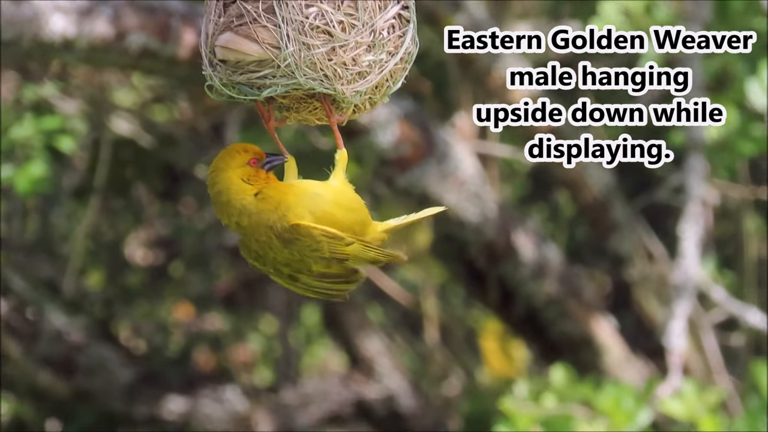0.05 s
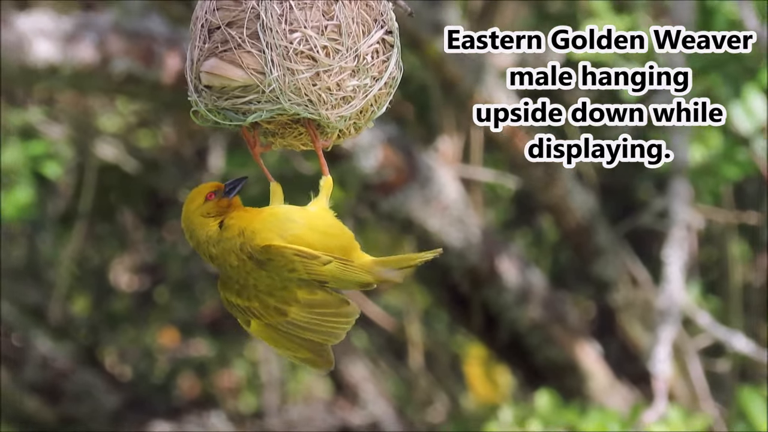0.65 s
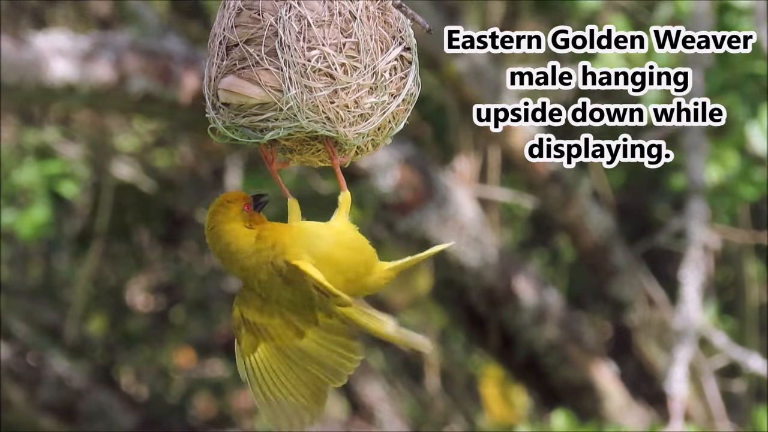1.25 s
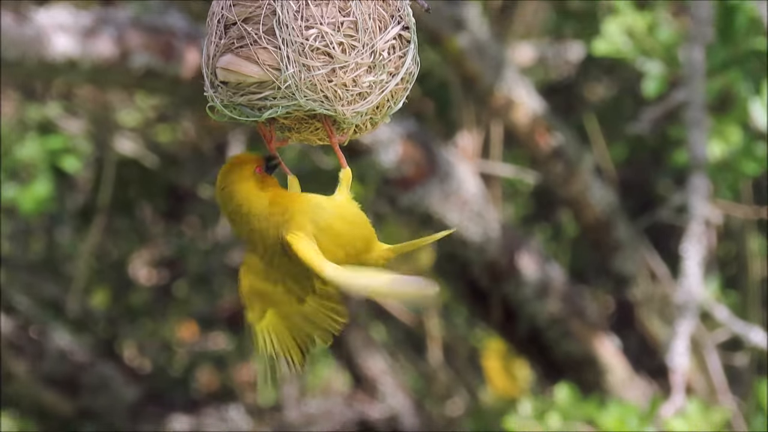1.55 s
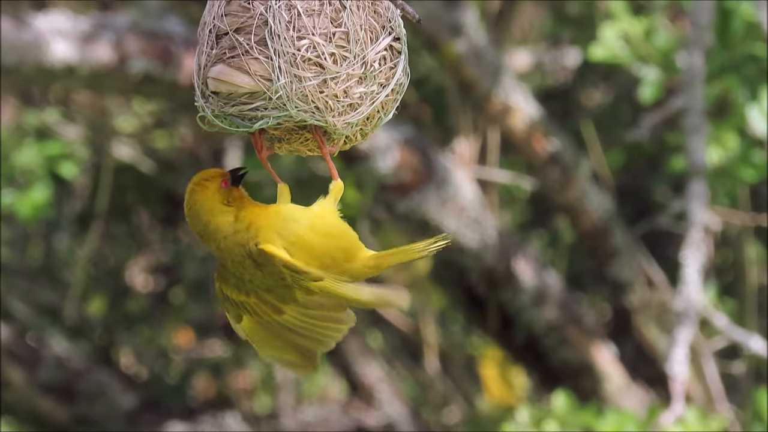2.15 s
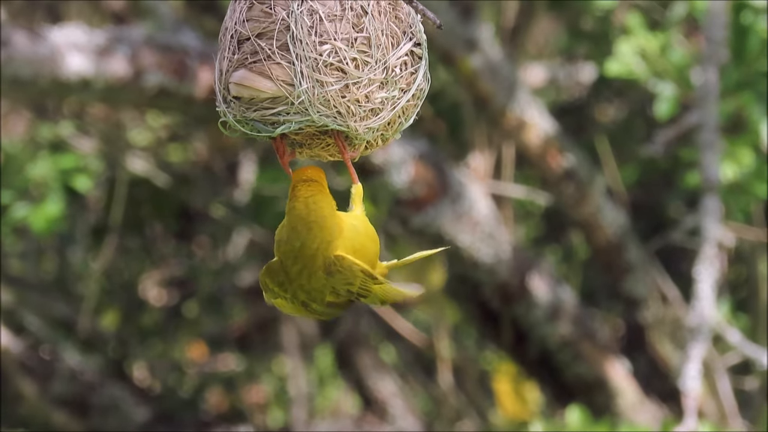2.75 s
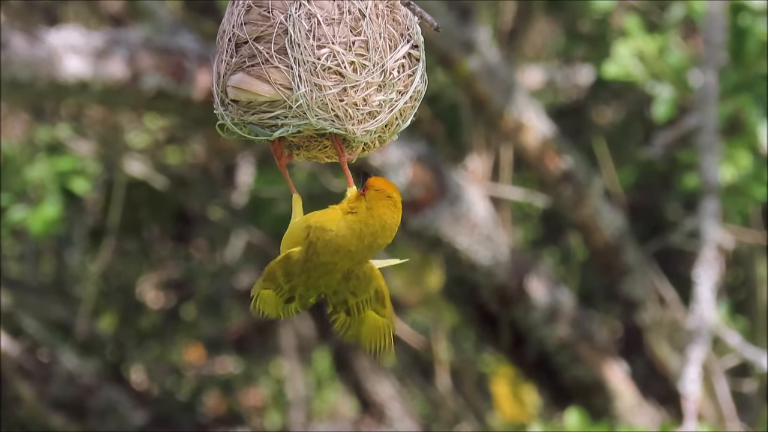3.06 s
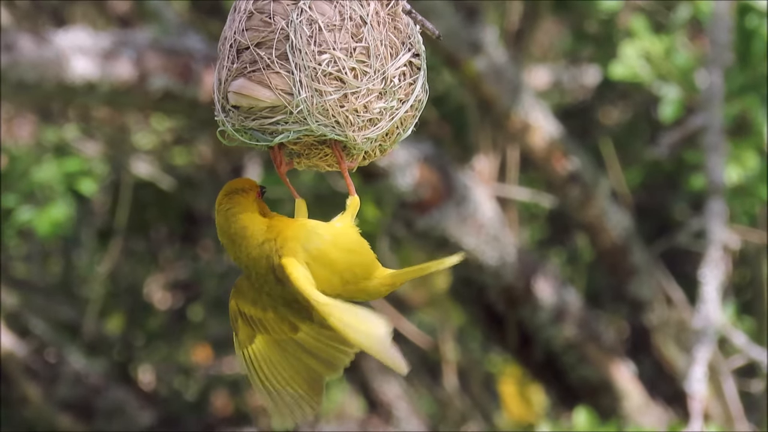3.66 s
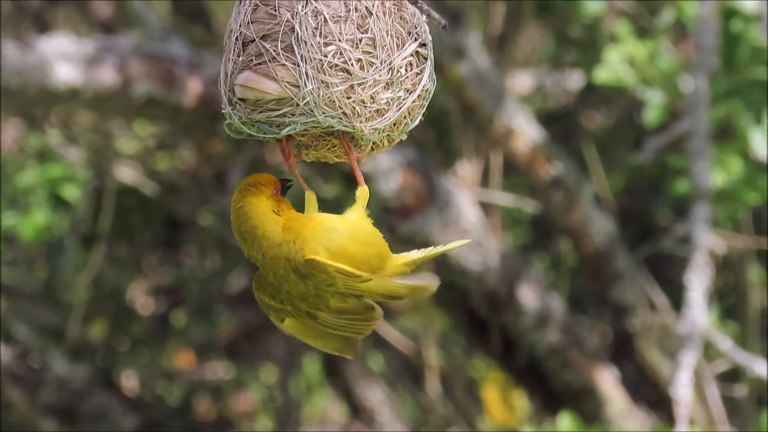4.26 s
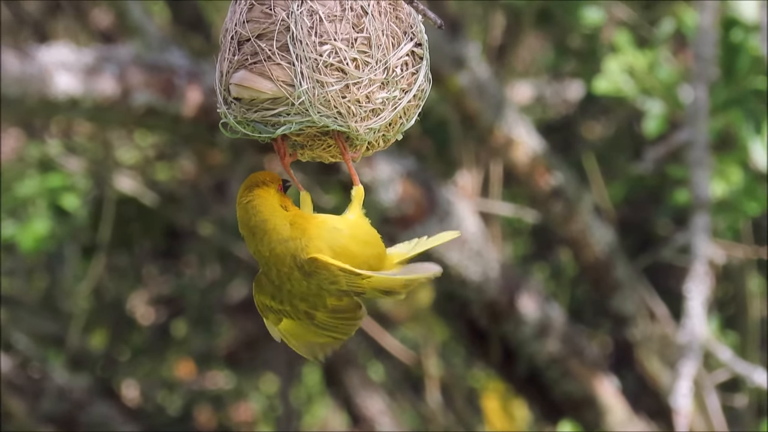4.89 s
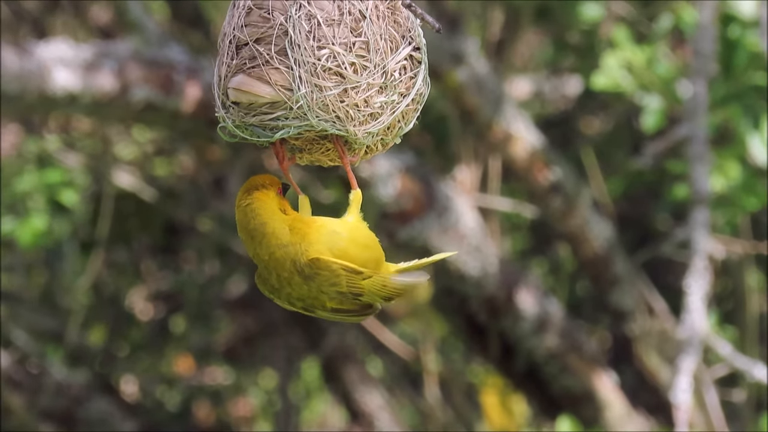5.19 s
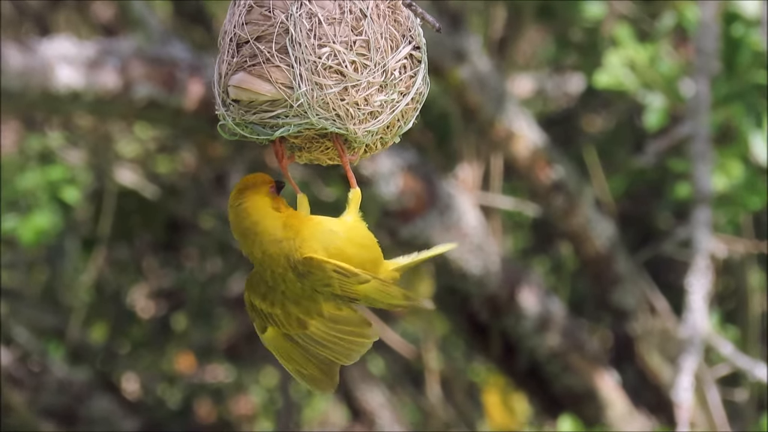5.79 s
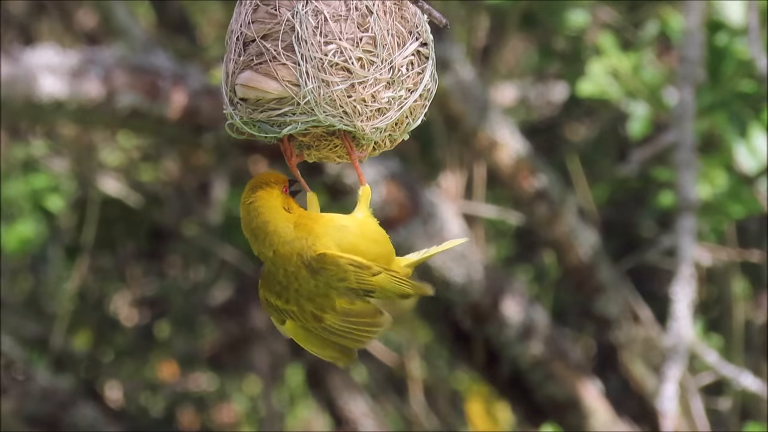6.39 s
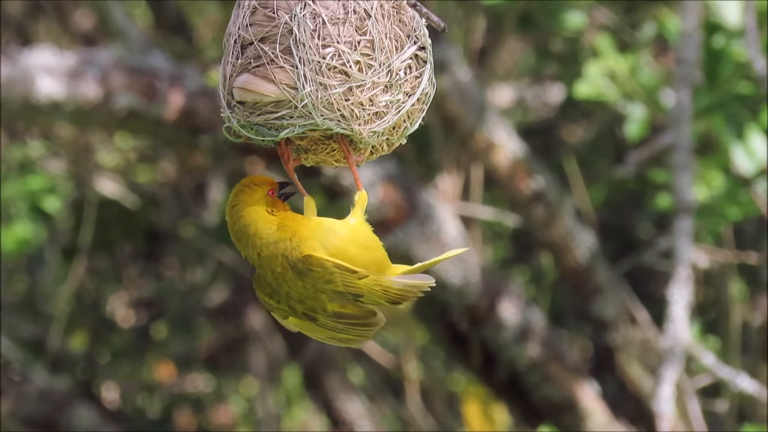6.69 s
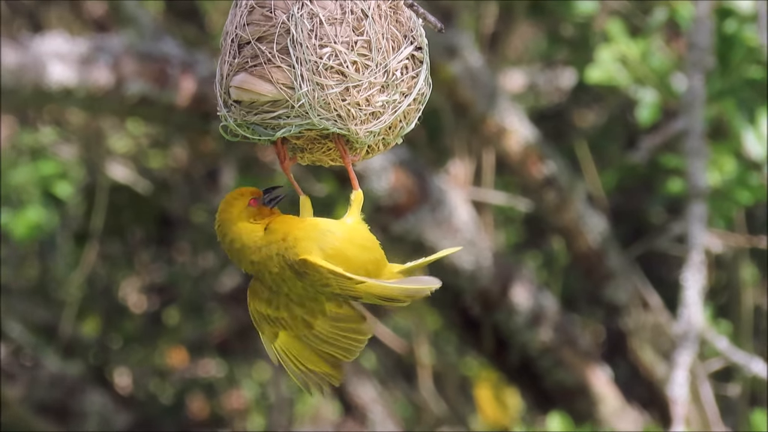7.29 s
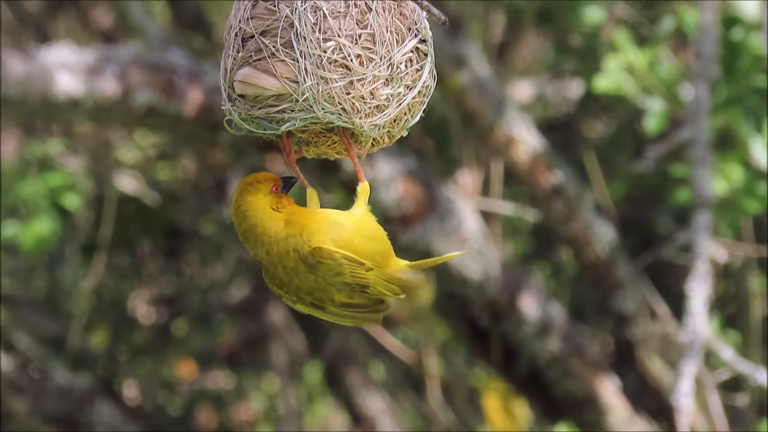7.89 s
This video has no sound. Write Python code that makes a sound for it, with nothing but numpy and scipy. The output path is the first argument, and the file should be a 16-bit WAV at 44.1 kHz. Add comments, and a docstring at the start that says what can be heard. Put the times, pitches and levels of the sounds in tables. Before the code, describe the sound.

A small bird in a thicket opens with two high, downward slurred notes and a rasping chirp. It then sings runs of wheezy, falling buzzes, three or four a second, dotted with short rasps. Soft nasal calls and a few thin whistles come from farther off. Leaves and trunks add a light echo, a faint outdoor rumble lies underneath, and two soft wind puffs touch the microphone. Everything gradually fades through the second half.

```python
"""A weaver bird displays at its nest in a thicket, whose leaves and trunks scatter the song.
Over a soft outdoor rumble come a thin 5 kHz ring and a slurred note, then the first rasping chirp and
a puff of wind. From about 0.9 s wheezy falling buzzes repeat, sung with both sides of the syrinx: two
oscillators, frequency-modulated by fast trills. From 2.6 s nasal calls come from farther off,
later joined by thin whistles, and from 3.4 s the whole scene fades away."""
import sys
import numpy as np
from scipy import signal
from scipy.fft import rfft, irfft
from scipy.io import wavfile

SR = 44100
rng = np.random.default_rng(int(sys.argv[2]) if len(sys.argv) > 2 else 0)


def unload_audio(sound):
    """Save the sound as a 16-bit wav file, at the path given as the first command line argument."""
    columns = np.transpose(np.atleast_2d(sound))
    # keep every value between -1 and 1, then stretch to whole-number steps
    steps = np.round(np.clip(columns, -1, 1) * 32767)
    wavfile.write(sys.argv[1], SR, steps.astype(np.int16))


N = 354608


def from_db(db):
    """Amplitude ratio: a factor of ten for every 20 dB."""
    return 10 ** (np.asarray(db) / 20)


def unit_power(x):
    """Normalisation to a mean square of one."""
    return x / np.sqrt(np.mean(x ** 2) + 1e-20)


def at_hz(points, hz):
    """Interpolation of a spectrum on a log-frequency axis."""
    freqs, values = np.transpose(points)
    return np.interp(np.log(np.maximum(hz, 1)), np.log(freqs), values)


def wander(count, per_s):
    """Low-pass noise: straight lines join Gaussian values, per_s of them each second."""
    knots = rng.standard_normal(512)
    return np.interp(np.arange(count) * per_s / SR, np.arange(len(knots)), knots)


def add(track, start_s, sound):
    """Superposition: a sound sums with what the track already holds."""
    first = max(int(start_s * SR), 0)
    part = sound[:max(N - first, 0)]
    track[first:first + len(part)] += part


def clock(length_s):
    """Time axis of a note, in seconds."""
    return np.arange(int(length_s * SR)) / SR


def ramp(t, rise_s):
    """Linear rise from 0 at time zero to 1, then held."""
    return np.clip(t / rise_s, 0, 1)


def envelope(t, attack_s, release_s):
    """Trapezoidal envelope: attack, hold, release."""
    return ramp(t - t[0], attack_s) * ramp(t[-1] - t, release_s)


def glide(t, first_hz, last_hz, bend):
    """Power-law frequency sweep: the greater the bend, the later the pitch moves."""
    return first_hz + (last_hz - first_hz) * (t / t[-1]) ** bend


def scoop(t, flat, settle_s=0.00301):
    """Onset transient: the pitch starts flat by a fraction and settles exponentially."""
    return 1 - flat * np.exp(-t / settle_s)


# Frequency response of the throat and open beak. Each row: frequency in Hz, gain in dB.
BEAK_RESPONSE = [(1500, 1.5), (3000, -2), (3700, -0.5), (4150, -3.5), (4450, 1.5), (4750, -3.5),
                 (5150, 3.5), (5600, -6.5), (6500, -5.5), (7200, -3.5), (8100, 0), (9400, -6), (10000, -8),
                 (10900, -20), (12000, -22)]

def syrinx(t, pitch_hz, effort, overtone_db, swing=0, trill_hz=0, unsteady=0, pulsing=0, jitter=0,
           dwell=0.22, lead=0):
    """Source and filter: one side of the syrinx makes a trilled tone and octave, shaped by the beak."""
    # frequency modulation at an uneven rate; dwell flattens the top of each stroke
    slip_s = np.cumsum(unsteady * wander(len(t), trill_hz)) / SR
    trill_phase = 2 * np.pi * trill_hz * (t + slip_s - np.interp(0, t, slip_s))
    stroke = np.sin(trill_phase) + dwell * np.cos(2 * trill_phase)
    hz = pitch_hz * (1 + swing * stroke) * (1 + jitter * wander(len(t), 1500))
    phase = 2 * np.pi * np.cumsum(hz) / SR
    # amplitude modulation of uneven strength, peaking lead radians before the top of the stroke
    depth = pulsing * swing / (np.max(np.abs(swing)) + 1e-3)
    throb = 1 + depth * (np.sin(trill_phase + lead) + 0.42 * wander(len(t), 2 * trill_hz))
    tone = from_db(at_hz(BEAK_RESPONSE, hz)) * np.sin(phase)
    octave = from_db(overtone_db + at_hz(BEAK_RESPONSE, 2 * hz)) * np.sin(2 * phase)
    return np.sqrt(2) * (tone + octave) * throb * effort


def near_echo(song, strength, notch_hz):
    """Comb filtering: an inverted reflection from close by weakens every multiple of notch_hz."""
    return song - strength * np.interp(np.arange(N) - SR / notch_hz, np.arange(N), song)


def thicket(song, wet_db, ring_hz=4500, ring=0, leaves_t60_s=0.069, trunks_t60_s=0.63):
    """Scattering: leaves, trunks and the trees behind return many small, dull echoes."""
    delay = clock(0.5)
    scatter = rng.standard_normal(len(delay)) * (rng.random(len(delay)) < 0.08)
    leaves = np.exp(-np.log(1000) * delay / leaves_t60_s)
    trunks = from_db(-11) * np.exp(-np.log(1000) * delay / trunks_t60_s)
    trees = from_db(-26) * np.exp(-((delay - 0.09) / 0.02) ** 2)   # a second swell after 90 ms
    echoes = unit_power(scatter * (leaves + trunks + trees)) / np.sqrt(len(delay))
    echoes = signal.sosfilt(signal.butter(2, 7500, fs=SR, output="sos"), echoes)
    # one narrow band of the later echoes rings on
    ringing = signal.lfilter(*signal.iirpeak(ring_hz, Q=18, fs=SR), echoes * (delay > 0.03))
    return song + from_db(wet_db) * signal.fftconvolve(song, echoes + ring * ringing)[:N]


# Spectrum of the background noise. Each row: frequency in Hz, relative spectral density in dB.
BACKGROUND_SPECTRUM = [(20, -3.5), (40, 4), (64, 0.5), (100, -5.5), (160, -7), (270, -4.5), (330, -10.5),
                       (450, -11.5), (700, -12.5), (1200, -18), (2300, -21), (3500, -19.5), (6000, -25.5),
                       (15500, -31.5)]
# Noise that differs between the channels. Each row: frequency in Hz, level against the middle in dB.
SIDE_NOISE_LEVELS = [(60, -61), (150, -66), (380, -28), (950, -29), (2380, -46.5), (5980, -30.5),
                     (15000, -6)]

def background(level_db=-53):
    """Shaped noise: outdoor rumble in the middle, plus a faint high hiss differing between channels."""
    hz = np.arange(N // 2 + 1) * SR / N
    mid, side = rfft(rng.standard_normal((2, N))) * from_db(at_hz(BACKGROUND_SPECTRUM, hz))
    side = side * from_db(at_hz(SIDE_NOISE_LEVELS, hz))
    return from_db(level_db) * unit_power(irfft(np.stack([mid + side, mid - side]), N))


# Thin tones: at 0 s a 5 kHz ring left by a chirp, at 3.526 s a steady 5 kHz tone within a wheeze,
# otherwise falling whistles. Each row: start in seconds, length in seconds, level in dB,
# first pitch in Hz, last pitch in Hz, trill swing as a fraction of the pitch.
THIN_TONES = [(0, .054, -60.5, 5020, 5000, 0.0038), (3.431, 0.046, -53.5, 3980, 3040, 0.014),
              (3.526, 0.088, -51, 4970, 4960, 0.0025), (5.515, .14, -71, 7860, 7160, 0.0081),
              (6.311, 0.044, -53.5, 2720, 2500, 0.082), (6.523, 0.076, -57.5, 2560, 2120, 0.058),
              (6.586, 0.073, -59, 2205, 2070, 0.022), (7.829, .04, -62, 2630, 2300, .05)]

def thin_tones():
    """Nearly pure tones, steady or falling: with little octave they sound thin."""
    out = np.zeros(N)
    for start, length, db, first_hz, last_hz, swing in THIN_TONES:
        t = clock(length)
        effort = envelope(t, attack_s=0.0064, release_s=0.0042)
        note = syrinx(t, glide(t, first_hz, last_hz, bend=2.6), effort, overtone_db=-30,
                      swing=swing, trill_hz=90.6, unsteady=0.36, pulsing=0.29, jitter=0.02)
        add(out, start, from_db(db) * note)
    return out


# Slurred notes. Each row: start in seconds, length in seconds, level in dB, top of the low glide in Hz.
SLUR_NOTES = [(0.097, .118, -42, 4540), (0.533, .126, -43, 4260)]

def slurs(top_hz=7150, end_hz=3480, swell_db=9):
    """Biphonation: two voices slide down; about halfway the upper swells and trills, the lower stops."""
    out = np.zeros(N)
    for start, length, db, low_hz in SLUR_NOTES:
        t = clock(length)
        trilling = ramp(t - length / 2, 0.015)
        fall_hz = end_hz + (top_hz - end_hz) * np.exp(-(t / (0.47 * length)) ** 2.8)
        effort = envelope(t, attack_s=0.004, release_s=0.014) * from_db(swell_db * (trilling - 1.5))
        high = syrinx(t, fall_hz * scoop(t, flat=0.221), effort, overtone_db=-25, jitter=0.024,
                      swing=0.015 + 0.15 * trilling, trill_hz=138.4, unsteady=0.163, pulsing=0.34)
        add(out, start, from_db(db) * high)
        t = clock(0.44 * length)
        pitch = glide(t, low_hz, 2800, bend=1.4) * scoop(t, flat=0.207)
        effort = envelope(t, attack_s=0.02, release_s=0.007)
        low = syrinx(t, pitch, effort, overtone_db=-21, jitter=0.0038)
        add(out, start + 0.14 * length, from_db(db) * low)
    return out


def tick():
    """A downward frequency sweep so brief that it is heard as a tick."""
    t = clock(0.0096)
    effort = from_db(2) * envelope(t, attack_s=0.0062, release_s=0.0049) ** 2
    return syrinx(t, glide(t, 5455, 2900, bend=1.39), effort, overtone_db=-28, jitter=0.011)


# Rasping chirps. Each row: start in seconds, length in seconds, level in dB, run-up gain in dB.
RASP_CHIRPS = [(0.306, 0.045, -40.5, -8), (0.89, 0.044, -39, -4.5), (1.367, .043, -40, -10),
               (1.911, 0.041, -38.5, -10), (2.618, 0.044, -37, -8.5), (3.137, 0.05, -36.5, -6.5),
               (3.793, .037, -39, -4), (4.362, 0.04, -38.5, -5), (5.113, 0.042, -40, -6.5),
               (6.216, 0.046, -38.5, -2), (7.268, .047, -39.5, -1)]

def rasps(tick_lead_s=0.053, run_up_s=0.027):
    """Roughness from irregular modulation: a tick, a soft run-up, then a loud trill rising a little."""
    out = np.zeros(N)
    for start, length, db, run_up_db in RASP_CHIRPS:
        t = clock(run_up_s + length + 0.0071) - run_up_s   # negative during the run-up
        effort = envelope(t, attack_s=0.016, release_s=0.017) * from_db(run_up_db * ramp(-t, 0.003))
        opening = ramp(t, 0.01995)
        burst = syrinx(t, 4130 + 330 * opening, effort, overtone_db=-22.5, swing=0.11 + 0.026 * opening,
                       trill_hz=124.6, unsteady=0.1553, pulsing=0.46, jitter=0.0552, dwell=0.1, lead=1.82)
        add(out, start - tick_lead_s, from_db(db) * tick())
        add(out, start - run_up_s, from_db(db) * burst)
    return near_echo(out, strength=0.41, notch_hz=933)


# Puffs of wind. Each row: start in seconds, length in seconds, level in dB.
WIND_PUFFS = [(0.34, 0.083, -50), (5.01, 0.074, -48)]

def wind_puffs(band_hz=(35, 85)):
    """Wind noise: brief low-frequency pressure fluctuations thud on the microphone."""
    out = np.zeros(N)
    band = signal.butter(2, band_hz, "band", fs=SR, output="sos")
    for start, length, db in WIND_PUFFS:
        count = int(length * SR)
        thud = signal.sosfilt(band, rng.standard_normal(count)) * np.hanning(count)
        add(out, start, from_db(db) * unit_power(thud))
    return out


def upsweep():
    """Two rising frequency sweeps, low register then high, make one quick flick."""
    t = clock(0.019)
    effort = from_db(-3.5) * envelope(t, attack_s=0.01, release_s=0.0057)
    low = syrinx(t, glide(t, 2720, 4050, bend=1.71), effort, overtone_db=-36, jitter=0.029)
    t = clock(0.0096)
    effort = from_db(-4) * envelope(t, attack_s=0.0045, release_s=0.0033)
    high = syrinx(t, glide(t, 5600, 8200, bend=1), effort, overtone_db=-36, jitter=0.024)
    return np.concatenate([low, high])


# Wheezes. Each row: start in seconds, length in seconds, level in dB, late swell of the buzz in dB.
WHEEZE_NOTES = [(0.875, 0.2, -50, 6), (1.169, 0.21, -47, 3.5), (1.453, 0.2, -47.5, 3),
                (1.732, 0.2, -48.5, 8), (2.006, .21, -49.5, 3.5), (2.305, 0.19, -45.5, 3),
                (3.518, 0.19, -47.5, 5.5), (3.788, 0.21, -48, 7), (4.107, 0.2, -46.5, 5.5),
                (4.413, 0.19, -46, 8), (4.69, .2, -47, 4.5), (6.158, .19, -48, 6),
                (6.429, 0.18, -47.5, 8.5), (6.708, 0.2, -47, 5), (7.017, .2, -48.5, 7.5),
                (7.315, 0.2, -47.5, 8), (7.611, 0.19, -46, 3.5)]

def wheezes(top_hz=5876, end_hz=4097, break_s=0.033, fall_s=0.058):
    """Modulation sidebands: after an upsweep, a high voice breaks into a falling buzz over a low voice."""
    out = np.zeros(N)
    for start, length, db, swell_db in WHEEZE_NOTES:
        trill_offset, detune = rng.standard_normal(2)
        t = clock(length + 0.008)
        buzzing = ramp(t - break_s, 0.006)
        late = ramp(t - length / 2, length / 2)
        pitch = end_hz + (top_hz - end_hz) * np.exp(-np.maximum(t - break_s, 0) / fall_s)
        effort = envelope(t, attack_s=0.071, release_s=0.014) * from_db(swell_db * late)
        high = syrinx(t, pitch, effort, overtone_db=-9.5 - 7 * late ** 2,
                      swing=0.135 * buzzing, trill_hz=158.4 + 5 * trill_offset,
                      unsteady=0.0848, pulsing=0.35, jitter=0.027, dwell=0.26, lead=0.98)
        pitch = glide(t, 3378, 2908, bend=1.25) * (1 + 0.012 * detune)
        effort = from_db(-9.5) * envelope(t, attack_s=0.0057, release_s=0.025)
        low = syrinx(t, pitch, effort, overtone_db=-12.5, swing=0.065 * ramp(t - break_s, 0.027),
                     trill_hz=163.5, unsteady=0.205, jitter=0.008)
        add(out, start - 0.024, from_db(db) * upsweep())
        add(out, start, from_db(db) * (high + low))
    return near_echo(out, strength=0.13, notch_hz=589.5)


# Distant nasal calls. Each row: start in seconds, level in dB, pitch in Hz.
NASAL_NOTES = [(2.608, -52, 1760), (2.78, -49.5, 1785), (2.968, -51, 1770), (3.131, -55.5, 1694),
               (3.315, -50.5, 1750), (4.987, -48.5, 1790), (5.204, -49, 1785), (5.393, -52.5, 1745),
               (5.57, -54, 1745), (5.749, -55, 1695), (5.921, -54.5, 1672), (7.92, -52, 1705)]

def nasal_calls(length_s=0.075, droop=0.278):
    """Nasal timbre: the second harmonic outweighs the fundamental; the pitch droops as each call ends."""
    out = np.zeros(N)
    t = clock(length_s)
    effort = envelope(t, attack_s=0.0087, release_s=0.022)
    for start, db, hz in NASAL_NOTES:
        pitch = glide(t, hz, hz * (1 - droop), bend=4.68) * scoop(t, flat=0.04)
        call = syrinx(t, pitch, effort, overtone_db=7.5, jitter=0.014)
        add(out, start, from_db(db) * unit_power(call))
    return out


def scene():
    """Superposition: the birds sound from the middle, each layer with its own echoes from the thicket."""
    buzzes = thicket(wheezes(), wet_db=0, ring_hz=4730, ring=0.36)
    chirps = thicket(rasps(), wet_db=-1, ring_hz=5200, ring=1)
    slurred = thicket(slurs(), wet_db=-5)
    faint_notes = thicket(nasal_calls() + thin_tones(), wet_db=-4.5)
    return background() + faint_notes + slurred + chirps + wind_puffs() + buzzes


def record(dry, fade_start_s=3.38, fade_end_s=8.574, cutoff_hz=15760):
    """Attenuation: the gain falls linearly, and a steep low-pass filter removes the top treble."""
    faded = dry * np.interp(np.arange(N) / SR, [fade_start_s, fade_end_s], [1, 0])
    return signal.sosfilt(signal.ellip(12, 0.1, 80, cutoff_hz, fs=SR, output="sos"), faded)


dry = scene()
out = record(dry)
unload_audio(out)
```